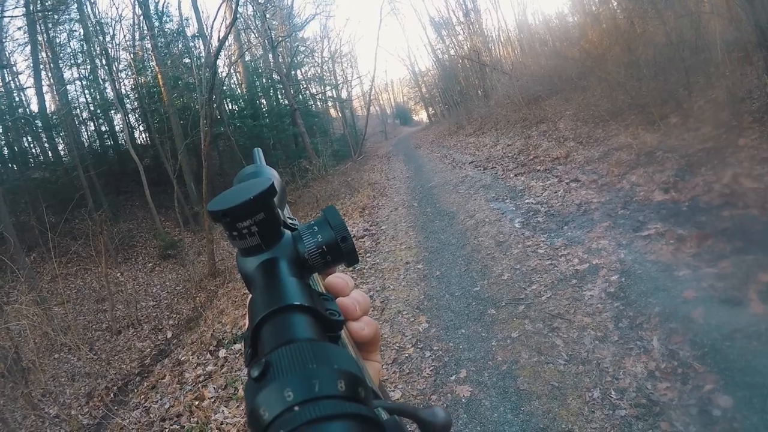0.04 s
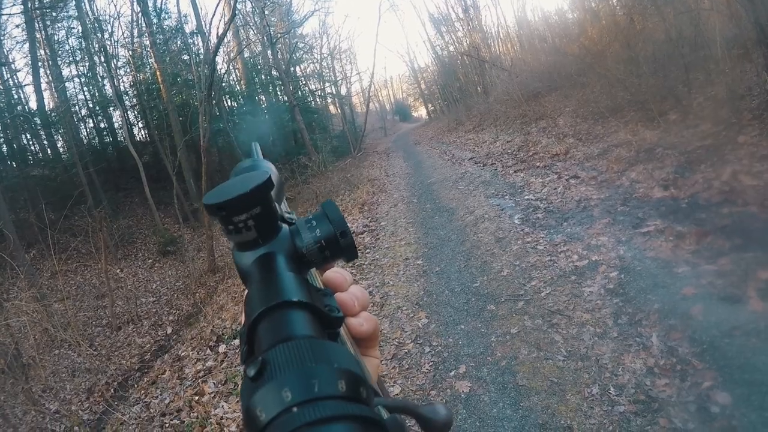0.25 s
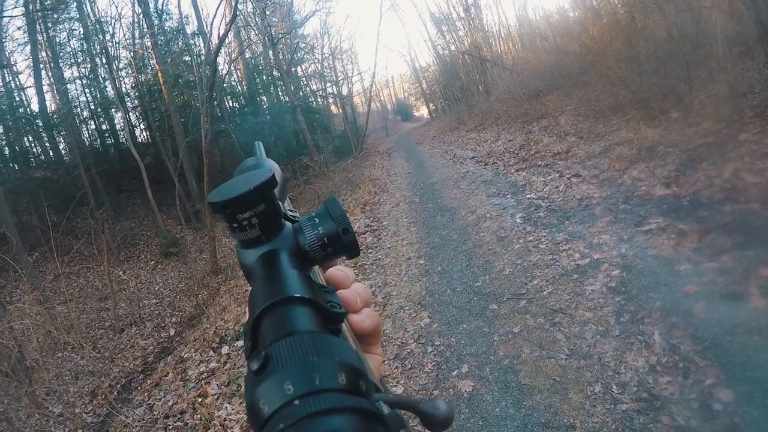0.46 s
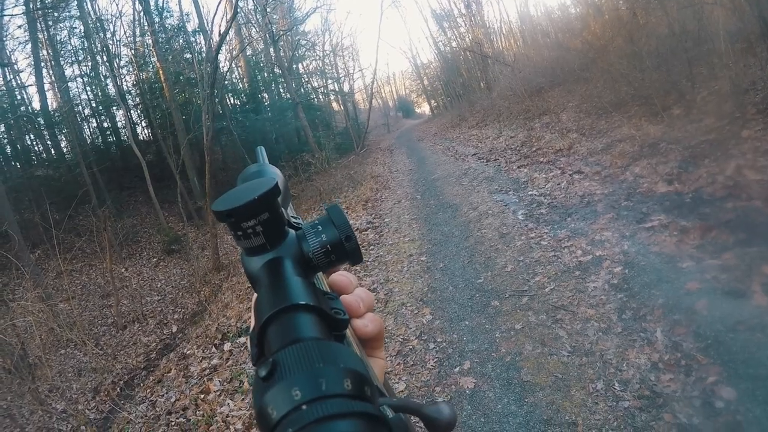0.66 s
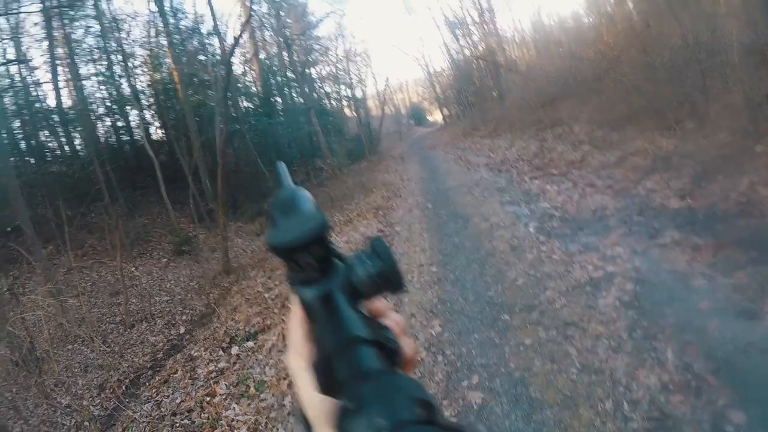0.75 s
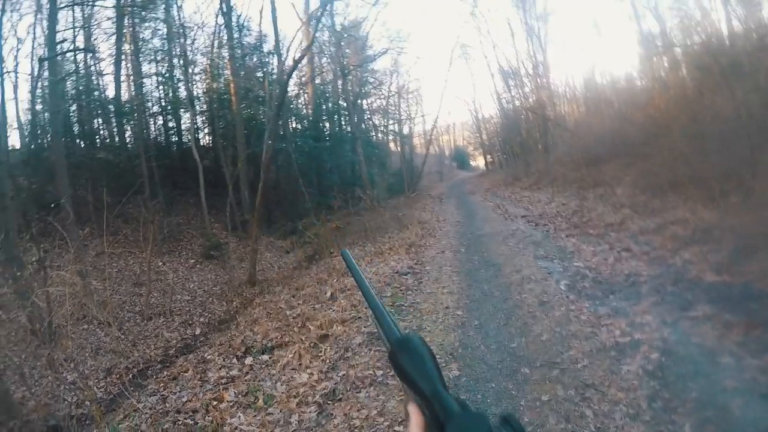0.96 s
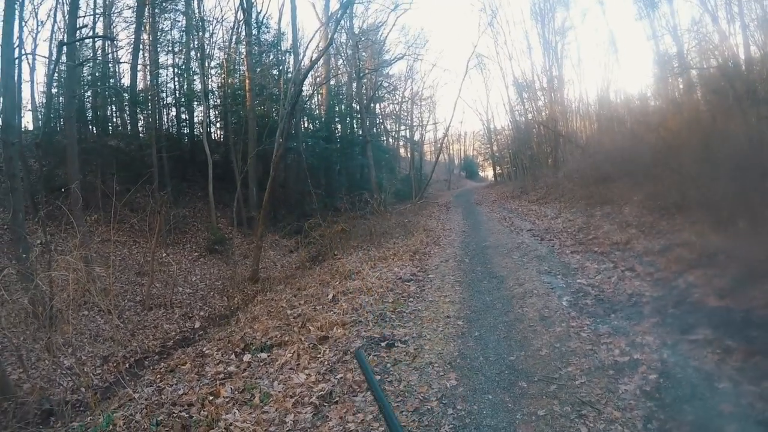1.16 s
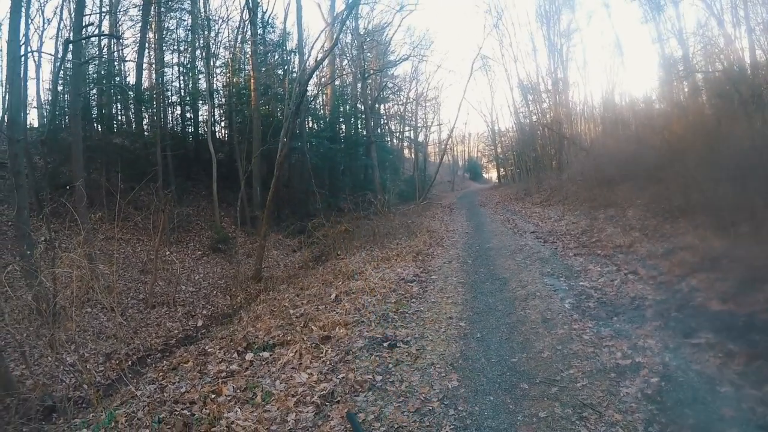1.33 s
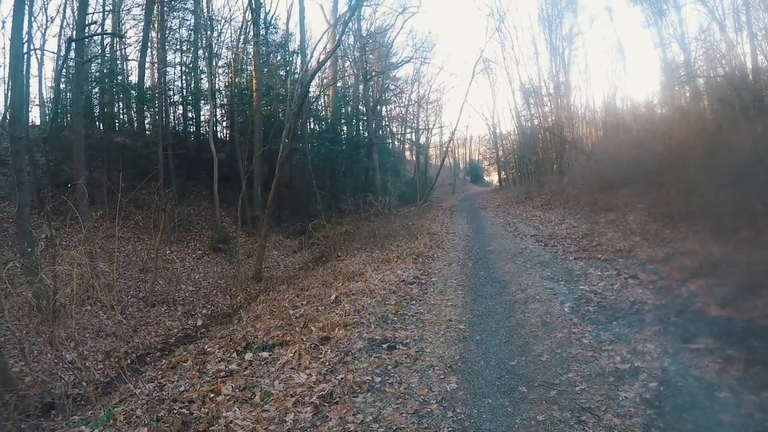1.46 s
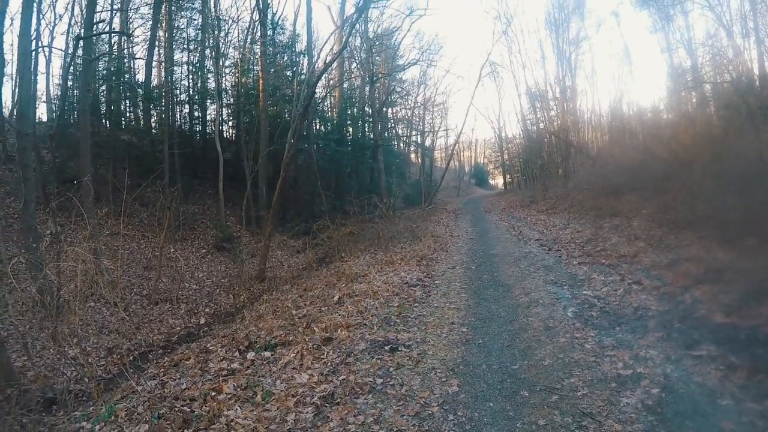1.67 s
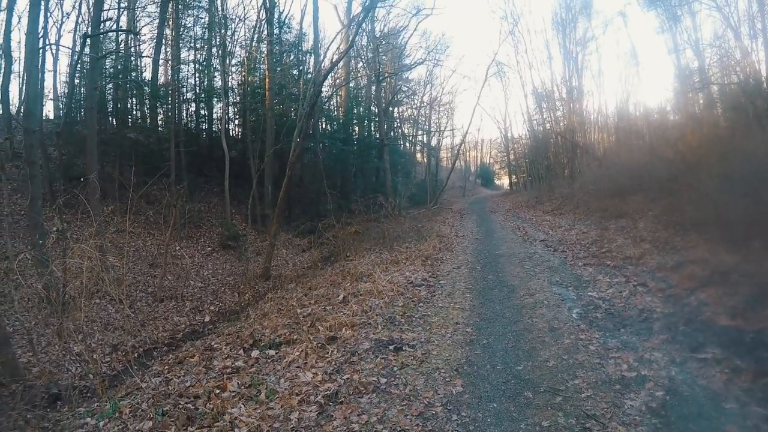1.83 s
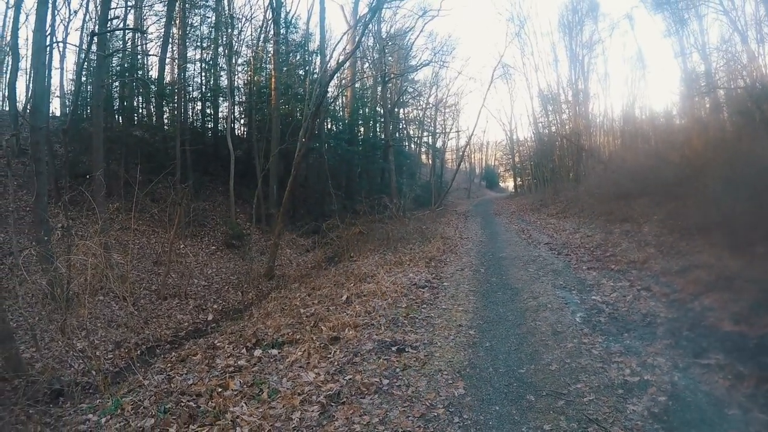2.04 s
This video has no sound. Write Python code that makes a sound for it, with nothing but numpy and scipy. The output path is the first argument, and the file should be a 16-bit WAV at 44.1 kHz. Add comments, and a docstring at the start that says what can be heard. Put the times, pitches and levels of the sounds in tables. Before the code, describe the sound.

A single loud rifle shot echoes through the woods, followed by two faint handling clicks.

```python
"""Light wind and a faint click, then one rifle shot on a woodland track, heard from behind the gun.
The crack and muzzle blast overload the microphone. Near trunks throw back sharp echoes, the
woods a long, dulling roll. The recorder's gain ducks, holds and recovers.
The rifle clicks twice and a sleeve rustles as it is lowered."""
import sys
import numpy as np
from scipy import signal
from scipy.fft import rfft, irfft
from scipy.io import wavfile
from scipy.ndimage import minimum_filter1d

SR = 44100
rng = np.random.default_rng(int(sys.argv[2]) if len(sys.argv) > 2 else 0)


def master_out(mix):
    """Clip the mix to full scale and print it as 16-bit PCM to the path in sys.argv[1]."""
    frames = np.transpose(np.atleast_2d(mix))
    ceiling = np.clip(frames, -1, 1)
    pcm = np.round(ceiling * 32767).astype(np.int16)
    wavfile.write(sys.argv[1], SR, pcm)


N = 92610
TIME_S = np.arange(N) / SR

SHOT_S = 0.2205
SWING_HZ, SWING_DB, SWING_T60_S = 20.7, 3.5, 0.14
SCATTER_DELAY_S, SCATTER_DB = 0.009, -5.5
AIR_DB_PER_S_AT_1KHZ, AIR_EXPONENT = 2.41, 1.525
REFLECTIONS_PER_S, REFLECTION_GROWTH_S, REFLECTION_POWER_SHARE = 1400, 0.15, 0.3985
HUSH_DB = -66
THRESHOLD_DB, MAX_DUCK_DB, HOLD_S, RECOVER_DB_PER_S = -7, 13.5, 0.68, 21
CLIP_LEVEL, LOWEST_HZ, CUTOFF_HZ = 0.76, 15, 15400

# Noise spectra. Each row: frequency in Hz, relative density in dB.
WIND_SPECTRUM = [(25, 4), (45, 0.5), (90, -5.5), (160, -14.5), (300, -24.5), (600, -41.5), (2000, -69)]
HUSH_SPECTRUM = [(100, -2), (500, -0.5), (1100, -8.5), (2300, -12.5), (4500, -14.5), (8000, -20),
                 (15000, -24)]
RUSTLE_SPECTRUM = [(300, -2.5), (1500, 4), (4500, 0.5), (8000, -11.5), (15000, -20)]
CRACK_SPECTRUM = [(200, -7), (900, -0.5), (1700, 10), (3000, -5), (4600, 10.5), (6500, -9.5),
                  (15000, -15.5)]
ROLL_SPECTRUM = [(50, -12), (160, -18), (280, -10), (520, -0.5), (850, -1), (1300, -5), (2600, -1),
                 (4600, -3.5), (7500, -9.5), (11000, -14.5), (15000, -14.5)]
SCATTER_SPECTRUM = [(40, -5.5), (130, -4.5), (300, -0.5), (700, -7.5), (1300, 4), (2500, 0), (4800, -4),
                    (8000, -14), (15000, -29)]
# Envelopes. Each row: time in seconds, level in dB.
WIND_ENVELOPE = [(0, -47.5), (.2, -50), (.8, -53.5), (1.3, -47.5), (1.6, -47.5), (1.92, -52), (2.1, -48.5)]
RUSTLE_ENVELOPE = [(1.55, -86), (1.68, -65), (1.8, -77), (1.95, -77.5), (2.01, -64), (2.1, -67.5)]
ROLL_ENVELOPE = [(.23, -5), (.29, -14.5), (.38, -14), (.45, -18), (.55, -22.5), (.68, -22.5), (.76, -22),
                 (.85, -21.5), (1.05, -27), (1.35, -35.5), (1.7, -44.5), (2.1, -44)]  # before air loss; the far slope returns a second swell
# Handling clicks. Each row: start in seconds, level in dB, T60 in seconds, centre in Hz.
RIFLE_CLICKS = [(.1605, -61, .09, 1751), (1.6735, -64, 0.044, 5500), (1.6795, -54.5, .03, 3474),
                (2.0215, -45.5, 0.019, 3450), (2.0225, -59.5, .012, 12000), (2.0235, -43, 0.024, 1200)]
# Metal fittings. Each row: start in seconds, peak in dB, T60 in seconds, frequency in Hz.
FITTING_MODES = [(2.0217, -50, 0.028, 3940), (2.0234, -42, 0.031, 1570), (2.040, -61, .025, 10330)]
# Action and crack. Each row: start in seconds, level of the added step in dB; the first, low step is the firing
# pin's action.
ACTION_AND_CRACK_STEPS = [(0.2149, -20.5), (0.2166, -4), (.2190, 19)]
# Muzzle blast and ground bounces. Each row: arrival in seconds, peak in dB, push length in seconds.
SHOCK_FRONTS = [(0.2208, 29, .0028), (0.2275, 20, 0.00048), (0.2291, 17, .0024)]
# Trunk and bank echoes. Each row: start in seconds, level in dB, T60 in seconds, centre in Hz.
ECHO_BURSTS = [(.2295, -3, 0.012, 5000), (.2378, -19, .012, 6043), (.2535, -3.5, .015, 2004),
               (.2590, -3, .008, 2181), (.2672, -17, 0.016, 9000), (.2825, -10, 0.084, 557),
               (.3240, -17, 0.19, 396), (.3272, -5, .008, 3900), (.3362, 2.5, 0.0066, 4150),
               (.3810, -14.5, 0.036, 790), (.4160, -16.5, 0.0074, 4900)]
# Decay of the undergrowth scatter. Each row: frequency in Hz, T60 in seconds.
SCATTER_T60 = [(100, 0.65), (350, 0.52), (1500, 0.16), (5000, 0.23), (12000, 0.66)]


def from_db(db):
    """Decibels to gain."""
    return 10 ** (np.asarray(db) / 20)


def envelope(rows):
    """Gain over time, interpolated in dB."""
    return from_db(np.interp(TIME_S, *np.transpose(rows)))


def unit_rms(x):
    """Scale to unit power."""
    return x / np.sqrt(np.mean(x ** 2) + 1e-20)


def at_hz(rows, hz):
    """Interpolate over log frequency."""
    row_hz, values = np.transpose(rows)
    return np.interp(np.log(hz), np.log(row_hz), values)


def decay(start_s, t60_s):
    """Jump to one, then fall 60 dB per T60."""
    return (TIME_S >= start_s) * from_db(-60 * np.maximum(TIME_S - start_s, 0) / t60_s)


def damped_sine(start_s, db, t60_s, hz):
    """One decaying mode."""
    return from_db(db) * decay(start_s, t60_s) * np.sin(2 * np.pi * hz * (TIME_S - start_s))


def white():
    """Gaussian noise."""
    return rng.standard_normal(N)


def noise(spectrum, source=white):
    """Shape a source to a spectrum, at unit power."""
    hz = np.maximum(np.arange(N // 2 + 1) * SR / N, 1)
    gain = from_db(at_hz(spectrum, hz)) * (hz > LOWEST_HZ)
    return unit_rms(irfft(rfft(source()) * gain, N))


def bursts(rows):
    """Decaying noise bursts, about an octave wide."""
    out = np.zeros(N)
    for start_s, db, t60_s, hz in rows:
        band = signal.butter(2, [hz / 1.4, min(hz * 1.4, CUTOFF_HZ)], "band", fs=SR, output="sos")
        out += from_db(db) * decay(start_s, t60_s) * unit_rms(signal.sosfilt(band, white()))
    return out


def die_away(x, start_s, loss_db_per_s):
    """Silent until the start; then each frequency fades at its own rate."""
    hz, frame_s, frames = signal.stft(x, SR, nperseg=512)
    age_s = np.maximum(frame_s - start_s, 0)
    loss_db = loss_db_per_s(np.maximum(hz, LOWEST_HZ))[:, None] * age_s
    faded = signal.istft(frames * from_db(-loss_db), SR, nperseg=512)[1]
    return (TIME_S >= start_s) * faded[:N]


def breeze():
    """Low wind on the microphone over the faint hush of the woods."""
    wind = envelope(WIND_ENVELOPE) * noise(WIND_SPECTRUM)
    return wind + from_db(HUSH_DB) * noise(HUSH_SPECTRUM)


def handling():
    """The rifle clicks in the hands, its fittings ring, a sleeve rustles."""
    rings = sum(damped_sine(*mode) for mode in FITTING_MODES)
    rustle = envelope(RUSTLE_ENVELOPE) * noise(RUSTLE_SPECTRUM)
    return bursts(RIFLE_CLICKS) + rings + rustle


def crack():
    """A faint action click, then milliseconds of bright noise rising in steps until the blast arrives."""
    steps = sum(from_db(db) * (TIME_S >= start_s) for start_s, db in ACTION_AND_CRACK_STEPS)
    return noise(CRACK_SPECTRUM) * steps * (TIME_S < SHOT_S)


def muzzle_blast():
    """Each shock front is a sudden push and a longer suction; the microphone swings slowly after."""
    out = damped_sine(SHOT_S, SWING_DB, SWING_T60_S, SWING_HZ)
    for start_s, db, push_s in SHOCK_FRONTS:
        age = np.maximum(TIME_S - start_s, 0) / push_s
        out -= from_db(db) * (TIME_S >= start_s) * (1 - age) * np.exp(-age)
    return out


def trunk_reflections():
    """Single reflections crowd together as the sound spreads, over a diffuse wash."""
    age_s = np.maximum(TIME_S - SHOT_S, 0)
    rate_per_s = np.minimum(REFLECTIONS_PER_S * (1 + (age_s / REFLECTION_GROWTH_S) ** 2), SR)
    arrivals = rng.random(N) < rate_per_s / SR
    singles = arrivals * white() * np.sqrt(SR / rate_per_s)  # unit power at any rate
    return np.sqrt(REFLECTION_POWER_SHARE) * singles + np.sqrt(1 - REFLECTION_POWER_SHARE) * white()


def woods_roll():
    """Long roll of reflections; the air absorbs treble with distance travelled."""
    roll = noise(ROLL_SPECTRUM, trunk_reflections)
    dulled = die_away(roll, SHOT_S, lambda hz: AIR_DB_PER_S_AT_1KHZ * (hz / 1000) ** AIR_EXPONENT)
    return envelope(ROLL_ENVELOPE) * dulled


def echoes():
    """Distinct returns: bright off trunks, dull off banks."""
    return bursts(ECHO_BURSTS)


def near_scatter():
    """Leaf litter and undergrowth scatter the blast straight back."""
    scatter = from_db(SCATTER_DB) * noise(SCATTER_SPECTRUM, trunk_reflections)
    return die_away(scatter, SHOT_S + SCATTER_DELAY_S, lambda hz: 60 / at_hz(SCATTER_T60, hz))


def scene():
    """Mono sum at the microphone."""
    return (breeze() + handling() + crack() + muzzle_blast() + woods_roll() + echoes() + near_scatter())[None]


def gain_control(x):
    """Gain drops at once on a loud sound, holds, then creeps back."""
    over_db = np.clip(20 * np.log10(np.abs(x) + 1e-9) - THRESHOLD_DB, 0, MAX_DUCK_DB)
    half_hold = int(HOLD_S * SR / 2)
    held_db = -minimum_filter1d(-over_db, 2 * half_hold + 1, origin=half_hold, mode="constant")
    ramp_db = RECOVER_DB_PER_S * TIME_S
    duck_db = np.maximum.accumulate(held_db + ramp_db) - ramp_db
    return x * from_db(-duck_db)


def record(dry):
    """Gain control, overload, steep low-pass."""
    drive = gain_control(dry[0]) / CLIP_LEVEL
    clipped = CLIP_LEVEL * drive / (1 + drive ** 4) ** (1 / 4)
    lowpass = signal.butter(24, CUTOFF_HZ, fs=SR, output="sos")
    return signal.sosfiltfilt(lowpass, clipped)[None]


dry = scene()
out = record(dry)
master_out(out)
```